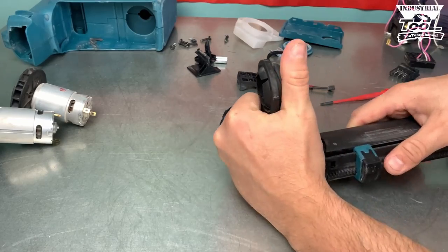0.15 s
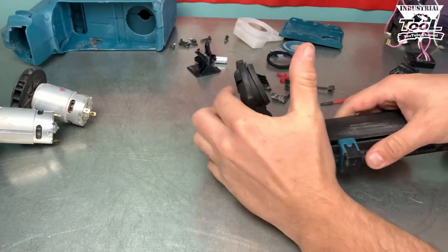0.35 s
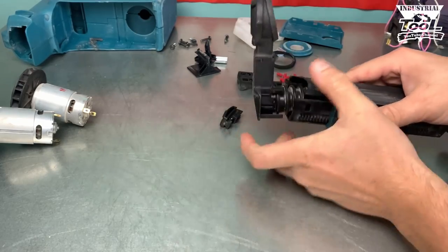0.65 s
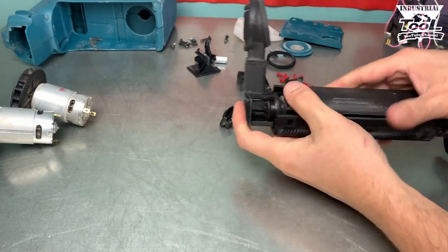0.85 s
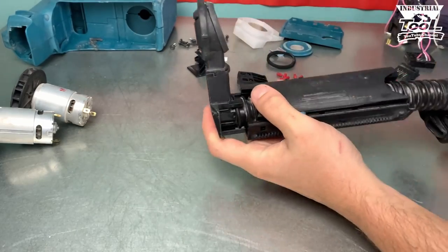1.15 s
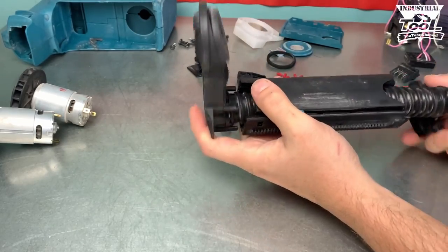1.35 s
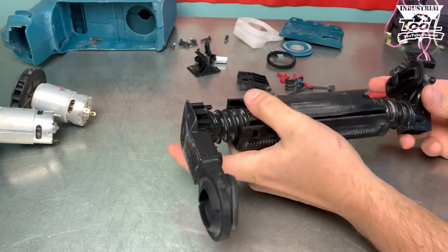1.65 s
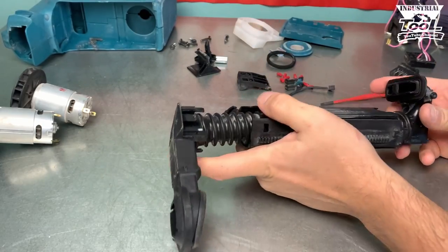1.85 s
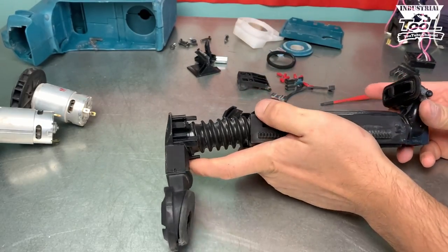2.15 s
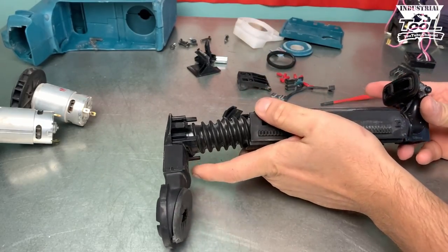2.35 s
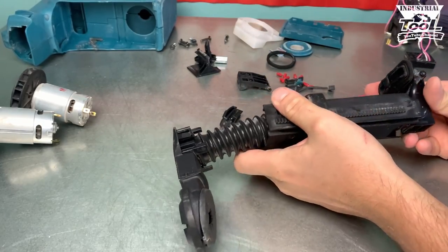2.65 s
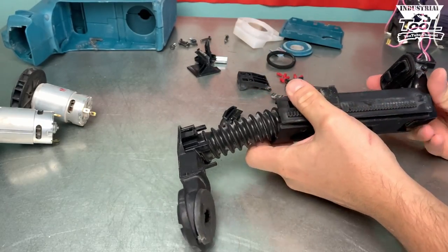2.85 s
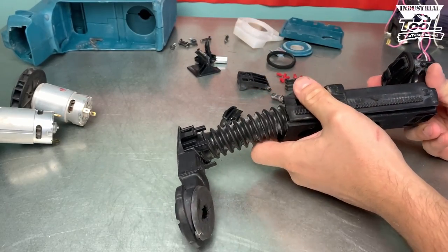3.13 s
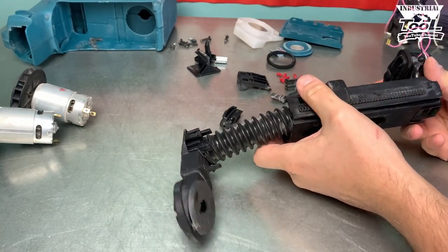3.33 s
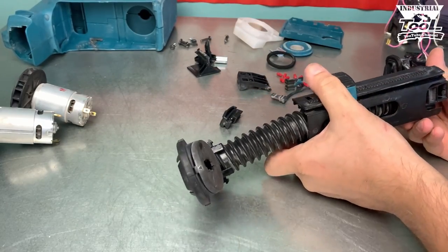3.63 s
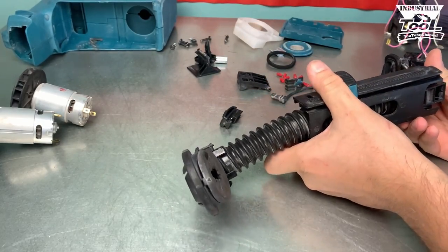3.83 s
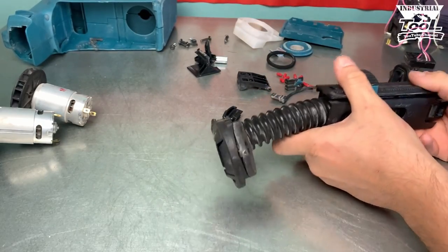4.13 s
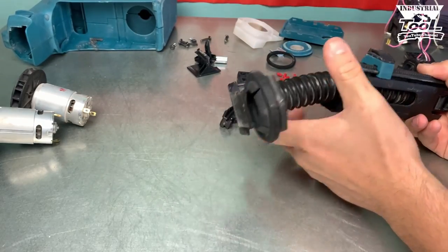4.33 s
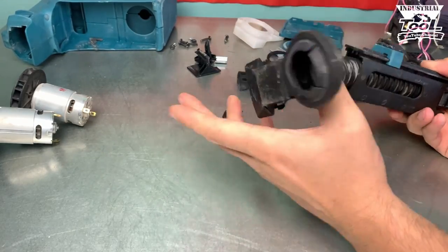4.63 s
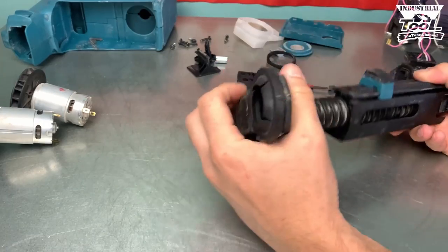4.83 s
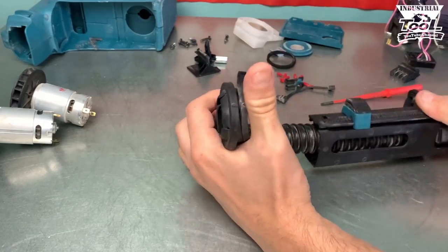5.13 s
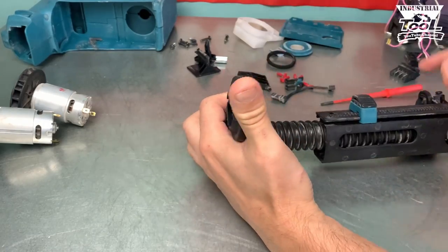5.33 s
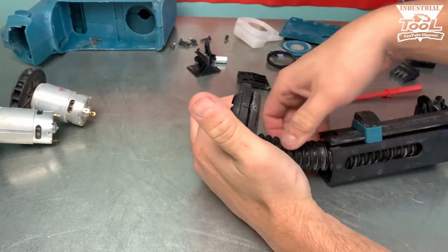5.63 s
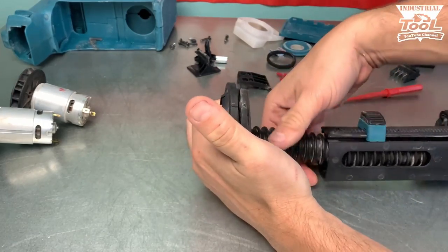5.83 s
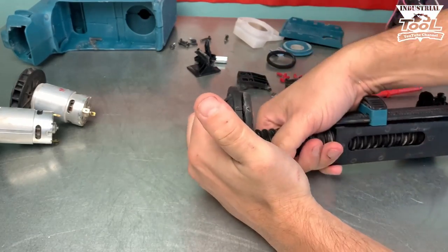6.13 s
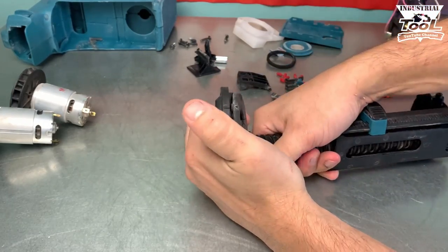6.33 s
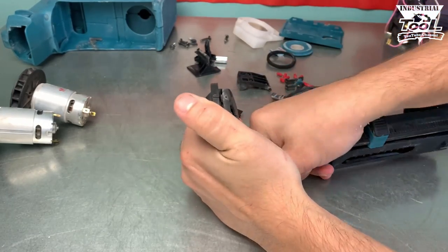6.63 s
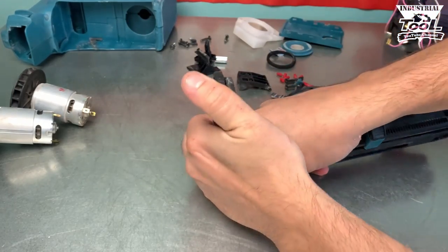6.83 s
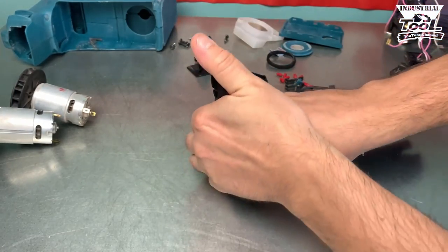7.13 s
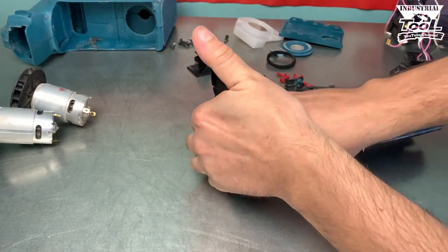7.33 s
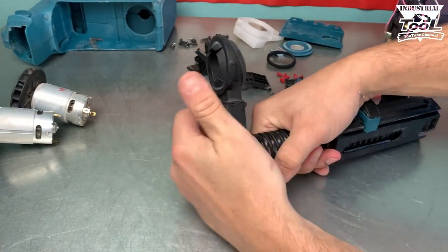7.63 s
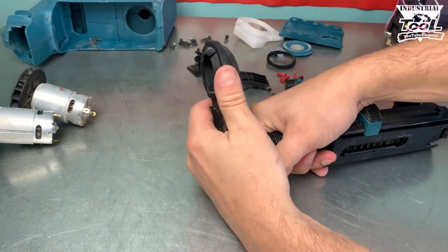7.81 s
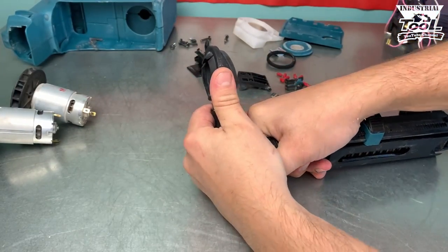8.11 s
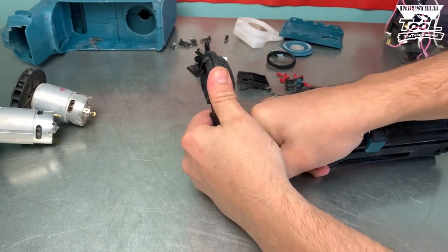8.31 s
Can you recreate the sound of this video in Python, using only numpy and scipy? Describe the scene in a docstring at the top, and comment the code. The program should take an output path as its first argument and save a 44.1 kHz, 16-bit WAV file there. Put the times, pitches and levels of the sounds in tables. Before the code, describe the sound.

Plastic and rubber being handled over a steel bench: dull and hard knocks, bright little ticks, skin and sleeve rubbing, short scuffs. The middle has paired knocks, then one hard, loud clack with more clatter and a brief squeaky scrape. Near the end, many tiny rubbery snaps run together, stop, and return briefly. Close microphone, short room reflections, very quiet hush and faint low air rumble.

```python
"""In a small workshop, two hands turn a plastic housing with a rubber bellows over a steel bench and press it together.
Knocks, tube pings and low puffs of air are damped modes, most with noise cracks; ticks are bursts of banded noise.
Skin, sleeve and rubber rub as patchy filtered noise; narrower bands of it scuff, squeak, ring and rattle.
The bellows folds pop faintly, then one by one, each of these a snap and a short ring.
A wall and the room answer; air rumbles faintly at the microphone over a quiet hush."""
import sys
import numpy as np
from scipy import signal
from scipy.fft import rfft, irfft, next_fast_len
from scipy.io import wavfile
from scipy.ndimage import uniform_filter1d, map_coordinates

SR = 44100
rng = np.random.default_rng(int(sys.argv[2]) if len(sys.argv) > 2 else 0)


def log_audio(samples):
    """Write samples as a 16-bit WAV file to the path given in sys.argv[1]."""
    # one column per channel
    frames = np.atleast_2d(samples).T
    # limit to full scale, then quantise
    limited = np.clip(frames, -1, 1)
    pcm = np.round(limited * 32767).astype(np.int16)
    wavfile.write(sys.argv[1], SR, pcm)


N = 373527

# modes of the hand's thump: (middle pitch [Hz], level [dB], t60 [s])
HAND_MODES = [(88.4, 0, 0.02), (151, -7, 0.091), (203, -6.5, 0.086)]
MODE_SCATTER_DB, MODE_DETUNE = 2, 0.015  # scatter of mode levels; relative scatter of mode pitches
DRAG_PATCHES_DB = 2.5  # unevenness of dragging friction
EVENT_T = np.arange(SR // 4) / SR  # time within one struck sound [s]


def amp(db):
    """Decibels to gain."""
    return 10 ** (np.asarray(db) / 20)


def unit(x):
    """Scaled to rms 1."""
    return x / np.sqrt(np.mean(x ** 2) + 1e-20)


def along(points, hz):
    """(Hz, value) points read on a log frequency axis."""
    f, value = np.transpose(points)
    return np.interp(np.log(hz + 1), np.log(f + 1), value)


def curves(rows):
    """One value per sample for each column after the time."""
    s, *columns = np.transpose(rows)
    return [np.interp(np.arange(N) / SR, s, column) for column in columns]


def wobble(rate):
    """A smooth random curve, rate knots a second."""
    knots = rng.standard_normal(int(N * rate / SR) + 4)
    return map_coordinates(knots, [np.arange(N) * rate / SR])


def filtered(x, response):
    """x passed through a complex response of frequency."""
    size = next_fast_len(len(x) + 8192)
    spectrum = rfft(x, size) * response(np.fft.rfftfreq(size, 1 / SR))
    return irfft(spectrum, size)[:len(x)]


def resonances(peaks):
    """The causal response of (Hz, width Hz, dB) peaks, summed with alternating sign."""
    def response(f):
        total = 0
        for k, (centre, width, db) in enumerate(peaks):
            peak = 1j * f * width / (centre * centre - f * f + 1j * f * width)
            total = total + (-1) ** k * amp(db) * peak
        return total
    return response


def ringing(modes, scatter_db):
    """Damped modes at new strengths and slightly new pitches, peak 1; the first swing is a suction."""
    x = np.zeros(len(EVENT_T))
    for hz, db, t60 in modes:
        decay = amp(db + scatter_db * rng.normal() - 60 * EVENT_T / t60)
        pitch = hz * (1 + MODE_DETUNE * rng.normal())
        x -= decay * np.sin(2 * np.pi * pitch * EVENT_T)
    x *= 1 - np.exp(-EVENT_T / 0.0012)  # the sound takes a moment to build
    return x / np.abs(x).max()


def crack(hz, t60):
    """A decaying burst of noise in a steep band around hz, peak 1."""
    band = resonances([(hz, 1.143 * hz, 0)])
    burst = amp(-60 * EVENT_T / t60) * rng.standard_normal(len(EVENT_T))
    x = filtered(burst, lambda f: band(f) ** 2)
    return x / np.abs(x).max()


def add(track, s, sound):
    """Mixes a sound in at second s."""
    track[round(s * SR):][:len(sound)] += sound


def friction(grains_db, patchy_db):
    """Noise with scattered slips, in random patches of pitch and time as the grip changes."""
    slips = (rng.random(N) < 250 / SR) * rng.standard_normal(N)  # about 250 a second
    z = signal.stft(rng.standard_normal(N) + amp(grains_db) * slips, nperseg=256)[2]
    patches = uniform_filter1d(rng.standard_normal(z.shape), size=5, axis=0)  # across pitch
    patches = uniform_filter1d(patches, size=14, axis=1)  # across time
    return signal.istft(z * amp(patchy_db * unit(patches)), nperseg=256)[1][:N]


def background():
    """Quiet room noise over a lumpy low rumble of air at the microphone."""
    # spectrum of the hush: (frequency [Hz], relative level [dB])
    hush_spectrum = [(29, -38), (50, -9), (113, -18), (192, -10), (351, -24.5), (491, -18.5), (740, -26.5),
                     (4830, -35.5), (8600, -43.5), (15700, -32)]
    # spectrum of the air rumble: (frequency [Hz], relative level [dB])
    rumble_spectrum = [(4.7, -28), (8.0, 12), (19, 7), (54, -14), (120, -19), (160, -34.5), (260, -120)]
    # swells of the air rumble: (time [s], level [dB])
    air_levels = [(0.0, -48), (0.26, -48), (0.35, -60), (1.16, -47), (1.23, -55), (3.73, -62.5),
                  (5.66, -49), (6.23, -57.5), (7.67, -49), (7.69, -60), (8.42, -51.5), (8.47, -58)]
    hush = unit(filtered(rng.standard_normal(N), lambda f: amp(along(hush_spectrum, f))))
    rumble = unit(filtered(rng.standard_normal(N), lambda f: amp(along(rumble_spectrum, f))))
    return amp(-72) * hush + amp(curves(air_levels)[0]) * rumble


def rubbing():
    """One grip flutter moves skin hiss, sleeve scrape and rubber drag, each a filtered friction noise."""
    # levels before the flutter: (time [s], skin hiss [dB], sliding in the sleeve [dB], rubber drag [dB])
    rub_levels = [(0.0, -72, -75.5, -67.5), (0.35, -78, -79, -79.5), (0.52, -73.5, -74, -64),
                  (0.8, -66.5, -66.5, -59), (1.23, -79.5, -81.5, -79.5), (1.72, -65.5, -67.5, -68.5),
                  (2.31, -82, -78.5, -73.5), (2.78, -75.5, -78, -81), (3.3, -83.5, -78, -85),
                  (3.51, -80.5, -76.5, -63.5), (4.34, -80.5, -82, -82.5), (5.14, -61.5, -69.5, -66),
                  (5.73, -68, -74, -65), (5.97, -67.5, -73.5, -60.5), (6.46, -80.5, -78, -73.5),
                  (6.7, -81, -84, -76), (6.84, -80, -77, -64), (7.08, -71.5, -80, -65.5),
                  (7.26, -84, -85, -79.5), (7.6, -72, -72.5, -68), (8.21, -80, -81, -80),
                  (8.47, -73.5, -67.5, -70.5)]
    # spectrum of the skin hiss: (frequency [Hz], relative level [dB])
    skin_spectrum = [(1760, -38.5), (3000, -16), (4000, -6), (4820, -12), (5920, -3), (12200, -9),
                     (14100, -16), (15500, -29.5)]
    # resonances of the sleeve: (centre [Hz], width [Hz], relative level [dB])
    sleeve_peaks = [(1080, 880, 2), (1820, 760, 4.5), (2586, 140, 3), (3200, 450, -4.5)]
    # resonances of the rubber: (centre [Hz], width [Hz], relative level [dB])
    rubber_peaks = [(273, 250, -8), (424.3, 61, 2), (604, 105, -6), (890, 130, -10.5)]
    skin_db, sleeve_db, drag_db = curves(rub_levels)
    flutter = amp(1.9 * wobble(25) + 1.8 * wobble(60))
    skin = unit(filtered(friction(8.9, 2.5), lambda f: amp(along(skin_spectrum, f))))
    sleeve = unit(filtered(friction(13, 2.7), resonances(sleeve_peaks)))
    drag = unit(filtered(friction(28, DRAG_PATCHES_DB), resonances(rubber_peaks)))
    return flutter * (amp(skin_db) * skin + amp(sleeve_db) * sleeve + amp(drag_db) * drag)


def scuffs_and_narrow_bands():
    """Gritty noise in one resonance, swelling and stopping short: broad scuffs; narrow squeaks, ring and rattle."""
    # short scuffs: (start [s], length [s], skin level [dB], plastic level [dB])
    scuff_strokes = [(0.051, 0.0935, -65.5, -65), (0.621, 0.058, -61.5, -65.5),
                     (0.708, 0.039, -59.5, -69.5), (0.871, 0.0822, -58, -63.5), (1.497, 0.145, -61, -65),
                     (1.782, 0.101, -65, -64.5), (2.69, 0.0552, -59.5, -59.5), (2.831, 0.0967, -61, -61),
                     (2.964, 0.0353, -57.5, -62), (2.996, 0.0282, -55, -52), (3.398, 0.116, -68.5, -67),
                     (4.013, 0.0763, -60, -65), (4.557, 0.11, -63.5, -80.5), (4.761, 0.13, -66.5, -63),
                     (6.057, 0.1235, -59, -57.5), (6.251, 0.052, -66.5, -64), (7.452, 0.079, -56, -66.5),
                     (7.755, 0.0876, -58, -56)]
    # resonances of skin, then plastic: (centre [Hz], width [Hz])
    scuff_bands = [(6607, 5000), (1574, 1615)]
    # narrow scrapes and squeaks, with the housing ringing on at 5.26 s and a rattle at 5.65 s,
    # all as banded noise: (start [s], length [s], level [dB], centre [Hz])
    narrow_strokes = [(0.632, 0.078, -56, 499), (0.761, 0.0555, -55.5, 406), (2.497, 0.186, -67, 1938),
                      (2.835, 0.097, -63, 447), (1.395, 0.22, -71, 1746), (5.26, 0.1956, -54, 713),
                      (5.65, 0.217, -53, 800), (4.555, 0.136, -60.5, 7630), (5.955, 0.242, -50.5, 641),
                      (5.99, 0.0263, -50.5, 1844), (6.253, 0.067, -60.5, 579), (7.642, 0.116, -62, 2950),
                      (7.756, 0.0757, -57, 903), (8.09, 0.083, -72, 3030)]
    swell, fade = 0.299, 0.247  # shares of a stroke's length

    strokes = []
    for s, length, *levels in scuff_strokes:
        for db, (hz, width_hz) in zip(levels, scuff_bands):
            strokes.append((s, length, db, hz, width_hz))
    for s, length, db, hz in narrow_strokes:
        width_hz = 210 * (hz / 1000) ** 0.6  # higher bands are wider
        strokes.append((s, length, db, hz, width_hz))

    out = np.zeros(N + SR)
    grit = friction(18.9, DRAG_PATCHES_DB) * amp(2.2 * wobble(70))
    for s, length, db, hz, width_hz in strokes:
        progress = np.arange(round(length * SR)) / (length * SR)
        band = resonances([(hz, width_hz, 0)])
        piece = grit[round(s * SR):][:len(progress)]
        banded = unit(filtered(piece, lambda f: band(f) ** 2))
        ramps = np.minimum(progress / swell, (1 - progress) / fade)
        add(out, s, amp(db) * np.sqrt(np.minimum(1, ramps)) * banded)
    return out[:N]


def ticks():
    """Edges and sticky skin let go in short bright clicks with a duller shadow in the plastic."""
    # small ticks: (time [s], level [dB])
    tick_events = [(0.0821, -42.5), (0.4133, -52.5), (0.4338, -54.5), (0.5047, -52.5), (0.5611, -47.5),
                   (0.8785, -48.5), (0.9595, -46), (1.3843, -47.5), (1.6176, -35), (1.6511, -45.5),
                   (2.7467, -44.5), (2.8289, -51.5), (2.8784, -40), (2.8994, -41), (2.9217, -47.5),
                   (3.1233, -61.5), (3.2172, -57.5), (3.9897, -52), (4.0424, -46), (4.4665, -56.5),
                   (4.5094, -48), (4.5542, -52), (4.659, -45), (4.6992, -53), (4.8273, -42), (4.9255, -50),
                   (5.8783, -48), (5.9095, -65.5), (5.9447, -44), (6.336, -50.5), (6.534, -48),
                   (7.272, -44.5), (7.4076, -49.5), (7.436, -46.5), (7.4738, -43.5), (7.6074, -53.5),
                   (7.7645, -49.5), (7.8077, -43.5)]
    middle_hz, spread = 6574, 0.17  # middle pitch, relative scatter
    out = np.zeros(N + SR)
    for s, db in tick_events:
        click = crack(middle_hz * np.exp(spread * rng.normal()), 0.018)
        shadow = crack(1740, 0.072)
        add(out, s, amp(db) * (click + amp(-14) * shadow))
    return out[:N]


def knocks():
    """A blow is one hard swing, then housing modes near its contact pitch; edges crack, the hand thumps."""
    # housing knocks: (time [s], level [dB], contact pitch [Hz], edge crack [dB], hand thump [dB])
    knock_events = [(0.089, -40.5, 1580, -29.5, -13.5), (0.141, -47.5, 1456, -20, -26),
                    (0.3275, -20, 790, -26.5, -12), (0.862, -52, 1510, -5, -7),
                    (1.407, -48, 1710, -9, -26.5), (2.004, -51.5, 560, -22, 7.5),
                    (2.338, -48.5, 430, -24, 1.5), (2.461, -61, 546, -18, -6.5),
                    (2.683, -51, 1630, -6, -22), (2.974, -46, 1640, -20, -6.5),
                    (3.188, -60, 547, -10, -25.5), (3.385, -25, 860, -17.5, -29),
                    (3.557, -24.5, 827, -20.5, -16.5), (5.1984, -12.5, 1260, -6, -12.5),
                    (5.6896, -32, 481, -1, -5), (5.763, -26, 1520, -2.5, -6), (5.995, -40, 773, 3.5, -15),
                    (6.125, -33, 562, -6.5, -11.5), (6.269, -51, 557, -10, -20.5),
                    (6.399, -59, 641, -5.5, -8.5), (6.442, -58.5, 570, -20, -7.5),
                    (6.507, -57, 517, 12, -22), (7.49, -33, 1354, -4, 0.5), (7.523, -47.5, 470, 8, -16),
                    (7.711, -28.5, 816, -8.5, -22.5), (8.123, -56.5, 1330, -0.5, -16)]
    # housing modes: (middle pitch [Hz], level [dB], share of the gripped ring time [ratio])
    housing_modes = [(373.2, 2, 0.64), (526.9, 5, 0.69), (664.3, 8, 0.496), (776, 0, 0.58),
                     (1169.8, 3, 0.53), (1559, -0.5, 0.39), (1705, -4.5, 0.71), (2305, -26, 0.57),
                     (3480, -8, 0.15), (3885, -17.5, 0.5)]
    # modes of the bench top under a blow: (middle pitch [Hz], level [dB], t60 [s])
    bench_modes = [(337.6, -2, 0.058), (537, -12, 0.18), (644.2, -1.5, 0.18), (795.7, -5, 0.3)]
    gripped_t60_s = 0.0273
    out = np.zeros(N + SR)
    for s, db, hz, crack_db, thump_db in knock_events:
        swing = ringing([(hz, 0, 9 / hz)], 0)
        # modes lose 4 dB per octave away from the contact pitch
        modes = [(f, level - 4 * abs(np.log2(f / hz)), share * gripped_t60_s)
                 for f, level, share in housing_modes]
        body = amp(1) * ringing(modes, MODE_SCATTER_DB)
        bench = amp(-21.5) * ringing(bench_modes, MODE_SCATTER_DB)
        thump = amp(thump_db) * ringing(HAND_MODES, MODE_SCATTER_DB)
        drone = amp(-24.5) * crack(450, 0.23)  # the bench top booms on dully
        # the loose parts inside shake on
        rattle = amp(-7.5) * crack(hz, 0.0794) + amp(-18.5) * crack(1.8 * hz, 0.06)
        edge = amp(crack_db) * (crack(4200, 0.03) + amp(-14) * crack(4000, 0.057))
        add(out, s, amp(db) * (swing + body + bench + thump + drone + rattle + edge))
    return out[:N]


def tube_taps_and_faint_pops():
    """Taps ping the hollow tube's damped modes with a noisy contact; faint bellows pops use the same modes."""
    # tube taps, and from 4.46 to 4.93 s faint bellows pops:
    # (time [s], level [dB], share of the free ring time [0-1], smaller when gripped firmly)
    ping_events = [(0.9, -27, 0.38), (1.476, -45.5, 0.15), (1.729, -65.5, 0.07), (1.803, -48.5, 0.35),
                   (1.925, -53.5, 0.02), (2.861, -51.5, 0.37), (3.009, -35.5, 0.1), (2.69, -48, 0.13),
                   (4.463, -67, .2), (4.558, -63, .2), (4.593, -57.5, 0.56), (4.633, -51, .3),
                   (4.693, -58.5, .2), (4.82, -53.5, .2), (4.925, -50, .2)]
    # modes of the free tube: (middle pitch [Hz], level [dB], t60 [s])
    tube_modes = [(426.6, 1.5, 0.372), (878, 9, 0.0987), (1380, -13, 0.177), (3220, -15, 0.09)]
    out = np.zeros(N + SR)
    for s, db, free in ping_events:
        modes = [(f, level, free * t60) for f, level, t60 in tube_modes]
        ping = ringing(modes, MODE_SCATTER_DB)
        add(out, s, amp(db) * (ping + amp(-13) * crack(1515, 0.088)))
    return out[:N]


def low_puffs():
    """Soft low puffs of air at the microphone, each a single low mode that dies within a few swings."""
    # puffs: (time [s], level [dB], middle pitch [Hz])
    puff_events = [(1.028, -43.5, 117.6), (1.285, -44.5, 68.5), (1.352, -50.5, 105), (5.619, -48.5, 100),
                   (6.905, -37, 84), (7.663, -47, 201), (8.16, -58, 213)]
    out = np.zeros(N + SR)
    for s, db, hz in puff_events:
        add(out, s, amp(db) * ringing([(hz, 0, 4 / hz)], 0))
    return out[:N]


def bellows():
    """Each fold flips with a snap, rings the air and rubber of the bellows and jolts the hand."""
    # folds popping over: (time [s], level [dB])
    fold_events = [(6.648, -40.5), (6.655, -33.5), (6.666, -32.5), (6.679, -32), (6.694, -31.5),
                   (6.711, -36.5), (6.771, -38), (6.791, -39), (6.814, -36), (6.847, -37), (6.883, -36),
                   (6.918, -35), (6.943, -35.5), (6.978, -43.5), (7.001, -33), (7.024, -34.5),
                   (7.054, -36.5), (7.106, -35), (7.123, -30.5), (7.139, -31), (7.165, -28), (7.187, -32),
                   (7.228, -33.5), (8.25, -34.5), (8.286, -32.5), (8.329, -35.5), (8.359, -26.5),
                   (8.374, -25), (8.393, -30)]
    # modes of the bellows: (middle pitch [Hz], level [dB], t60 [s])
    bellows_modes = [(432, -2, .055), (472, 0, .045), (570, -5, .022), (680, -5, .024), (820, -5.5, .024),
                     (1430, -23, .06), (4900, -19, .022)]
    lowest_hz = 370  # too small to radiate well below this
    middle_fold_db, middle_snap_db = -32.5, -41.5
    snap_growth = 0.75  # dB of snap per dB of fold: it grows less than the ring does

    def radiation(f):
        return -f * f / (lowest_hz ** 2 - f * f + 1j * f * lowest_hz)

    out = np.zeros(N + SR)
    for s, db in fold_events:
        snap = crack(12000, 0.0133) + crack(5140, 0.0037)
        snap += amp(-10.5) * crack(6440, 0.0339) + amp(-7.5) * crack(2770, 0.076)
        snap_db = middle_snap_db + snap_growth * (db - middle_fold_db)
        ring = filtered(ringing(bellows_modes, MODE_SCATTER_DB / 2), radiation)
        jolt = amp(-14) * ringing(HAND_MODES[:2], MODE_SCATTER_DB)
        add(out, s, amp(db) * (ring + jolt) + amp(snap_db) * snap)
    return out[:N]


def wall_echo(x):
    """The nearest wall returns one late, quieter copy with a softened treble."""
    delay_s, level_db, treble_hz = 0.0125, -11, 2500
    return filtered(x, lambda f: amp(level_db) * np.exp(-2j * np.pi * f * delay_s) / (1 + 1j * f / treble_hz))


def workshop(x):
    """Each frequency of the room's answer dies at its own speed, a few ms late."""
    # decay of the room: (frequency [Hz], t60 [s])
    room_decay = [(150, 0.67), (500, 0.32), (1500, 0.21), (4000, 0.35), (12000, 0.047)]
    hz, t, z = signal.stft(rng.standard_normal(SR // 2), SR, nperseg=256)
    decay = amp(-60 * t / along(room_decay, hz)[:, None])
    tail = signal.istft(z * decay, SR, nperseg=256)[1]
    late = np.pad(x, (300, 0))  # 300 samples, about 7 ms
    return signal.fftconvolve(late, tail / np.linalg.norm(tail))[:N]


def scene():
    """Near sounds in two groups, both answered by the room; knocks, pings and puffs also pass the wall echo."""
    small = rubbing() + scuffs_and_narrow_bands() + ticks() + bellows()
    echoed = knocks() + tube_taps_and_faint_pops() + low_puffs()
    near = echoed + wall_echo(echoed) + small
    room = amp(-12.5) * workshop(echoed) + amp(-17.5) * workshop(small)
    return (near + room + background())[None]


def record(dry):
    """The microphone dulls the top octave and keeps nothing above its band limit."""
    # treble of the microphone: (frequency [Hz], level [dB])
    mic_response = [(10000, -0.5), (13000, -2.5), (15500, -8.5)]
    top_hz = 15850
    return filtered(dry[0], lambda hz: amp(along(mic_response, hz)) * (hz < top_hz))[None]


dry = scene()
out = record(dry)
log_audio(out)
```